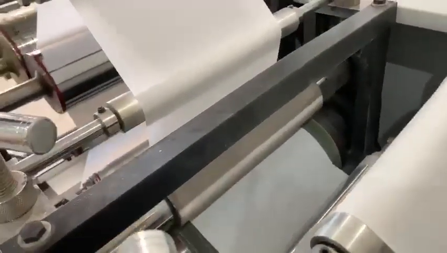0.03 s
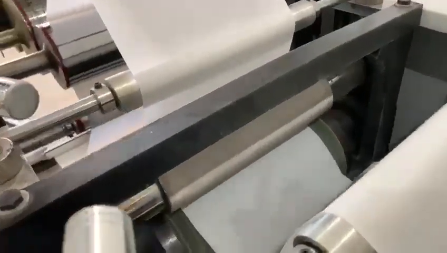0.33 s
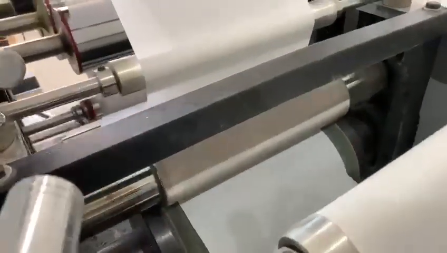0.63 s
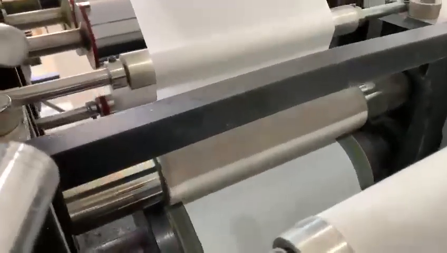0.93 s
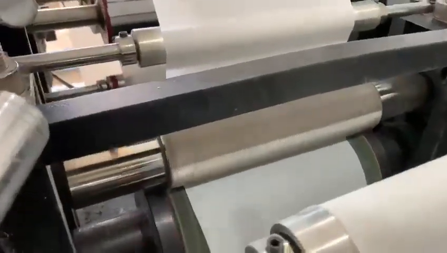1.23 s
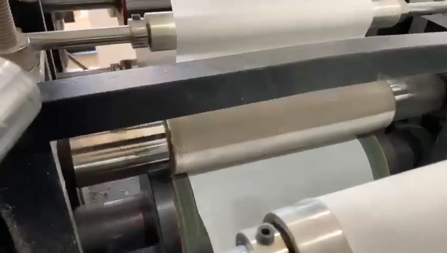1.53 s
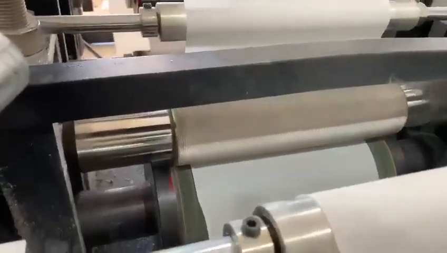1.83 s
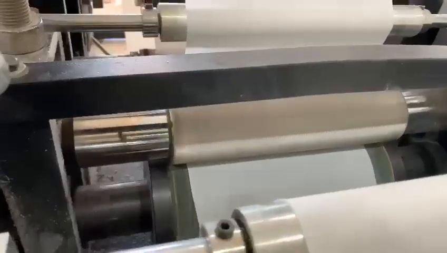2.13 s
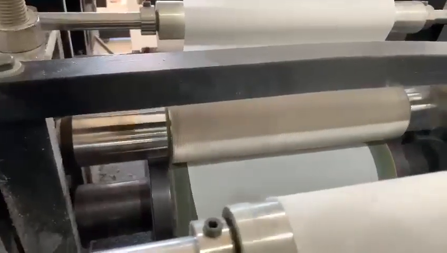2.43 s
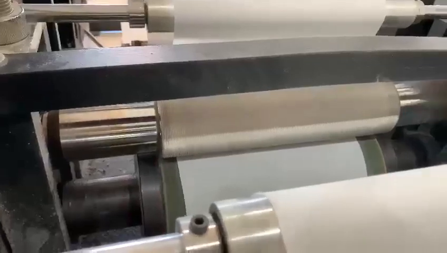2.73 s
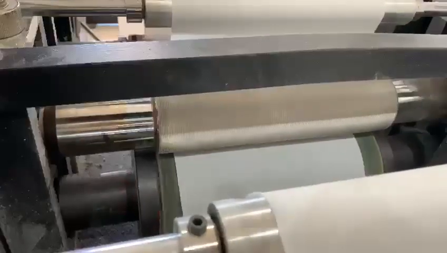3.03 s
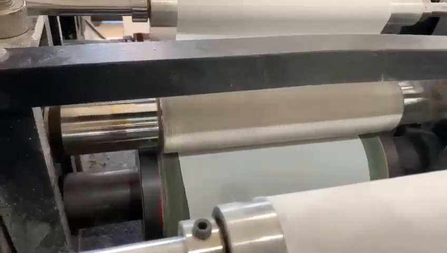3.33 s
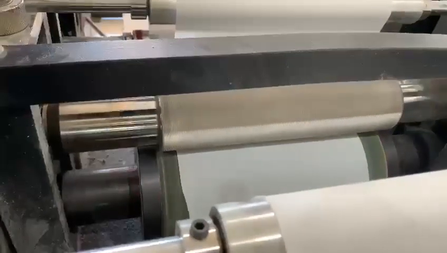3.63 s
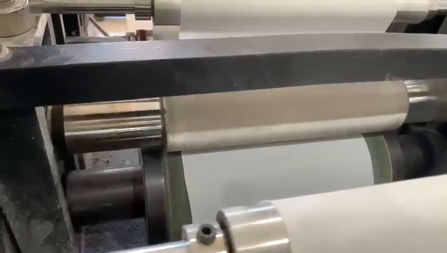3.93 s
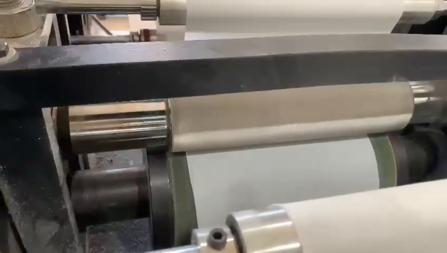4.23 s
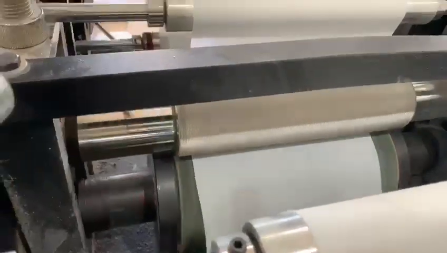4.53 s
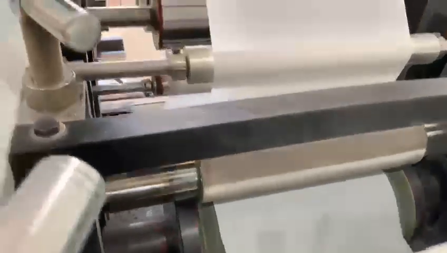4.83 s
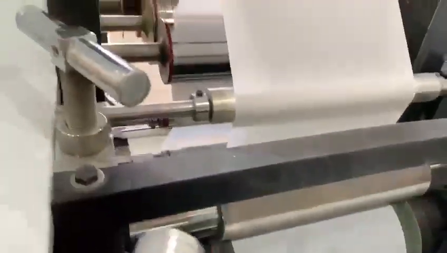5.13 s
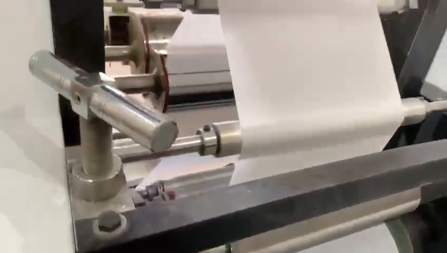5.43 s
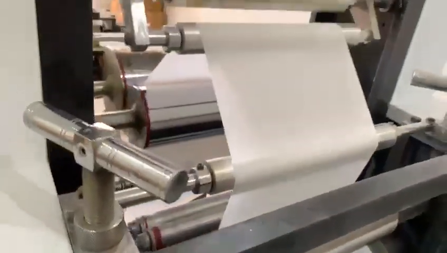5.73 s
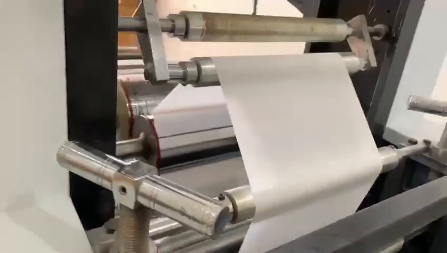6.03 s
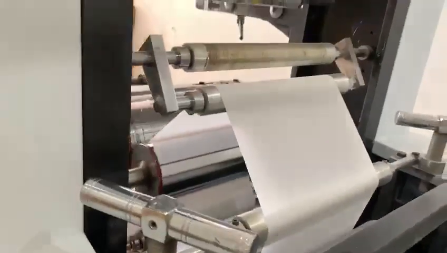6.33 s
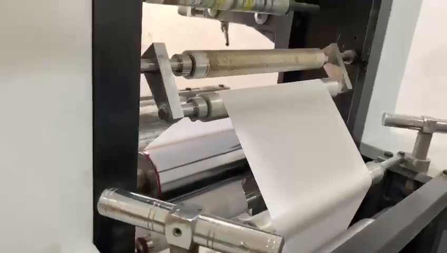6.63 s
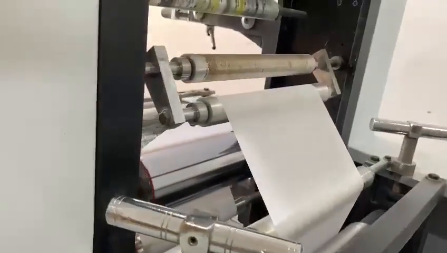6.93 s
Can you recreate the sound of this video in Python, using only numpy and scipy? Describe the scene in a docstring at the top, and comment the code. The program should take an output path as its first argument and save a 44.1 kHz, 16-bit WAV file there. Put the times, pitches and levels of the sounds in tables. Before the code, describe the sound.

A low machine rumble and motor hum carry on throughout as a close microphone moves along the rollers of a factory paper machine. A short droning note repeats about three times a second, mixed with bearing rattle, dull knocks and occasional light metal clinks. The moving paper adds a fine, ticking hiss, then a brief rustle toward the end as the drone drops away.

```python
"""Paper napkin machine in a factory hall

The machine runs steadily while the microphone moves along its rollers. The shaken steel frame rumbles,
with brief low swells, over a motor hum; a roller binds and drones once a turn, nearly three times a
second. The paper web hisses and ticks as it peels off the rollers, their bearings knock and chatter,
and loose steel parts clink lightly. Near the end an open span of paper rustles past."""
import sys
import numpy as np
from scipy import signal
from scipy.fft import rfft, irfft, next_fast_len
from scipy.io import wavfile
from scipy.ndimage import uniform_filter1d, map_coordinates

SR = 44100
rng = np.random.default_rng(int(sys.argv[2]) if len(sys.argv) > 2 else 0)


def digitize_waveform(pressure):
    """Quantize a signal to 16-bit integers and store it at the path in sys.argv[1].

    Rows of a 2-D input are taken as channels; values are limited to [-1, 1].
    """
    field = np.atleast_2d(pressure).T
    bounded = np.clip(field, -1, 1)
    quanta = np.round(bounded * 32767).astype(np.int16)
    wavfile.write(sys.argv[1], SR, quanta)


N = 316638
TURN_HZ = 2.865  # roller turns a second


def amp(db):
    """Decibels to gain."""
    return 10 ** (np.asarray(db) / 20)


def unit(x):
    """x scaled to rms 1."""
    return x / np.sqrt(np.mean(x ** 2) + 1e-20)


def along(points, hz):
    """A curve through (Hz, value) points, read on a log frequency axis."""
    point_hz, values = np.transpose(points)
    return np.interp(np.log(hz + 1), np.log(point_hz + 1), values)


def automation(points):
    """A fader move through (seconds, value) points, one value a sample."""
    return np.interp(np.arange(N) / SR, *np.transpose(points))


def wobble(rate):
    """A smooth random curve, rate knots a second."""
    knots = rng.standard_normal(int(N * rate / SR) + 4)
    return map_coordinates(knots, [np.arange(N) * rate / SR])


def cycle(per_turn, peak_s):
    """A swing between -1 and 1, locked to the roller's turn."""
    return np.cos(2 * np.pi * per_turn * TURN_HZ * (np.arange(N) / SR - peak_s))


def filtered(x, response):
    """x through an EQ given as gain against frequency."""
    size = next_fast_len(N + SR // 2)
    return irfft(rfft(x, size) * response(np.fft.rfftfreq(size, 1 / SR)), size)[..., :N]


def colour(points):
    """An EQ curve through (Hz, dB) points."""
    return lambda hz: amp(along(points, hz))


def resonances(modes):
    """The EQ curve of independently shaken modes: their powers add."""
    return lambda hz: np.sqrt(sum(
        (amp(db) * hz * width) ** 2 / ((centre ** 2 - hz ** 2) ** 2 + (hz * width) ** 2)
        for centre, width, db in modes))


def noise():
    """Two unrelated white noises."""
    return rng.standard_normal((2, N))


def patchy_noise(depth_db):
    """Two noises whose level drifts separately in every few hundred hertz."""
    spectrum = signal.stft(noise(), nperseg=512)[2]
    drift = uniform_filter1d(rng.standard_normal(spectrum.shape[1:]), size=4, axis=0)
    drift = uniform_filter1d(drift, size=9, axis=1)
    return signal.istft(spectrum * amp(depth_db * unit(drift)), nperseg=512)[1][:, :N]


def noise_burst(order, band_hz, length):
    """A short stereo burst of band-passed noise, rms 1."""
    band = signal.butter(order, band_hz, "bandpass", fs=SR, output="sos")
    return unit(signal.sosfilt(band, rng.standard_normal((2, length))))


def tone(hz):
    """A sine of rms 1 that follows a pitch curve."""
    return np.sqrt(2) * np.sin(2 * np.pi * (np.cumsum(hz) / SR + rng.random()))


def patter(per_s, level_db, scatter_db):
    """(seconds, dB) contacts at a steady mean rate, each at a chance moment within its slot."""
    count = int(per_s * N / SR)
    when, size = rng.random((count, 2)).T
    return zip((np.arange(count) + when) / per_s, level_db + scatter_db * (2 * size - 1))


def blows(contacts, t60_s, attack_s=.0008):
    """The envelope of (seconds, dB) contacts that hit at once and die away."""
    out, t = np.zeros(N + SR), np.arange(SR // 4) / SR
    for start, db in contacts:
        out[round(start * SR):][:len(t)] += amp(db - 60 * t / t60_s) * (1 - np.exp(-t / attack_s))
    return out[:N]


def panned(x, left_db):
    """x with the left side louder by left_db."""
    return x * amp(np.array([[left_db], [-left_db]]) / 2)


# Stereo image. Each row: frequency in Hz, left-right likeness (clipped to -1..1; 1 is mono).
LIKENESS = [(30, 0.83), (120, 0.95), (250, 0.87), (380, 0.74), (520, 0.28), (650, 0.3), (850, 0.16),
            (1400, -0.11), (1800, -0.33), (2400, 0.038), (4500, 0.11), (5500, 0.053), (6500, 0.77),
            (7600, -1.37)]


def spread(drive, response):
    """Two noises shaped into stereo of rms 1: narrow in the bass, mostly wide above."""
    def mid_side_eq(hz):
        angle = np.arccos(np.clip(along(LIKENESS, hz), -1, 1)) / 2
        return response(hz) * np.array([np.cos(angle), np.sin(angle)])
    mid, side = filtered(drive, mid_side_eq)
    return unit(np.array([mid + side, mid - side]))


# The microphone's closeness to the nip, where the big rollers meet. Each row: time in seconds, gain in dB.
NIP_CLOSENESS = [(0, -0.5), (1.1, 0), (2.6, 1), (3.6, -2), (4.4, -0.5), (5.4, -5), (5.9, -9.5), (6.4, -10),
                 (7.18, -9)]
# The ring of the frame, then of the nip. Each row: pitch in Hz, width in Hz, relative level in dB.
FRAME_MODES = [(53.7, 8, -16), (73.6, 16, -15), (107.5, 13, -8), (127, 12, -9), (143, 14, -9),
               (169, 2.5, -7.5), (176.3, 10.3, 0.5), (185.6, 26, -5.5), (206, 17, -12), (221, 12, -4),
               (250, 11.4, -7), (266, 14, -19), (305.6, 11.3, -2.5), (336, 29, -7.5)]
NIP_MODES = [(205.4, 9.7, -6.5), (361, 5, -6), (375.2, 6.9, 0.5), (397.5, 9.8, -5.5)]
# The dull bed of rumble. Each row: frequency in Hz, EQ gain in dB.
RUMBLE_EQ = [(20, -30), (45, -10.5), (85, -24), (102, -0.5), (200, 1), (320, 4), (400, -1), (560, -27),
             (1200, -108)]


def frame_rumble(cutoff_hz=470, follows_nip=.21):
    """The running gear shakes frame and nip, a little harder once a turn, over a broad rumble."""
    def shaken(modes):
        return spread(noise(), lambda hz: resonances(modes)(hz) / np.sqrt(1 + (hz / cutoff_hz) ** 8))
    close_db = automation(NIP_CLOSENESS)
    ring = amp(-19.5) * shaken(FRAME_MODES) + amp(-25.5 + close_db) * shaken(NIP_MODES)
    load_db = .5 * cycle(per_turn=1, peak_s=.22)
    shake_db = follows_nip * close_db + load_db + .5 * wobble(24)
    return amp(shake_db) * ring + amp(-25) * spread(noise(), colour(RUMBLE_EQ))


# Fader rides: the mains hum and the shaft's note slowly swell and dip.
# Each row: time in seconds, level in dB.
HUM_RIDE = [(0, -32), (0.8, -26.5), (1.8, -29), (2.7, -29), (3.6, -27), (4.0, -25), (4.6, -31),
            (5.6, -33.5), (6.1, -31), (7.18, -33.5)]
SHAFT_RIDE = [(0, -36), (1.8, -33), (3.6, -32), (4.1, -42), (4.8, -33), (5.5, -36), (5.85, -27), (6.2, -30),
              (6.6, -28), (7.18, -30)]
# Two close gear tones, then the drive's steady tones. Each row: pitch in Hz, relative level in dB.
GEAR_TONES = [(169, -28), (190.3, -28.5)]
DRIVE_TONES = [(52, -51), (674, -51), (2563, -53), (5970, -77)]


def motor(hum_hz=100, shaft_hz=257, waver_db=2.1):
    """Hum and shaft waver; the gears throb near the nip, and the drive's tones grow away from it."""
    close_db = automation(NIP_CLOSENESS)
    hum = amp(automation(HUM_RIDE) + waver_db * wobble(9)) * tone(hum_hz + .7 * wobble(9))
    shaft = amp(automation(SHAFT_RIDE) + waver_db * wobble(7.5)) * tone(shaft_hz + .87 * wobble(4.99))
    gears = sum(amp(db + 2 * wobble(17)) * tone(hz * (1 + .022 * wobble(14)))
                for hz, db in GEAR_TONES)
    drive = sum(amp(db + 1.7 * wobble(6.2)) * tone(hz * (1 + .00189 * wobble(16)))
                for hz, db in DRIVE_TONES)
    return hum + shaft + amp(.9 * close_db) * gears + amp(-.69 * close_db - 7) * drive


# The even rattle of the bearings. Each row: frequency in Hz, EQ gain in dB.
RATTLE_EQ = [(200, -31), (420, -4.5), (530, -0.5), (570, -3.5), (750, -3.5), (900, -7.5), (1300, -10),
             (1700, -11), (2400, -19), (5000, -99)]
# The ring of the hollow rollers. Each row: pitch in Hz, width in Hz, relative level in dB.
ROLLER_MODES = [(449, 19, -2.5), (476, 12, -2), (536.4, 14.4, -1), (601, 13, -4), (669, 16, -2),
                (670, 16, -10), (785, 22, -7), (1018, 13, -6.5), (1141, 11, -6), (1231, 10.4, -4.5),
                (1323, 20, -6)]


def rollers(follows_nip=.13):
    """The hollow rollers ring and rattle evenly on their bearings."""
    bearings = patchy_noise(depth_db=1.8) * amp(wobble(150))
    rattle = amp(-23) * spread(bearings, colour(RATTLE_EQ))
    ring = amp(-27) * spread(noise(), resonances(ROLLER_MODES))
    return (rattle + ring) * amp(follows_nip * automation(NIP_CLOSENESS))


# The bright hiss of the paper. Each row: frequency in Hz, EQ gain in dB.
HISS_EQ = [(700, -30), (1800, 0), (2600, 1.5), (3500, -0.5), (4400, -3.5), (5000, -7), (5800, -11),
           (6500, -9.5), (7400, -7), (8000, -14), (8600, -68)]


def paper_hiss(grain_db=1.0, flutter_db=.9):
    """The paper's fibres hiss in fine grains as the web peels off the rollers."""
    fibres = patchy_noise(depth_db=2.1) * amp(grain_db * wobble(900) + flutter_db * wobble(45))
    return amp(-32) * plate_reflections(spread(fibres, colour(HISS_EQ)))


def plate_reflections(x, count=4, gain=.28):
    """Near steel plates throw back weak early copies; their comb drifts as the microphone moves."""
    out, sway_s = x.copy(), .0005 * wobble(1)
    for _ in range(count):
        for side, delay_s in enumerate(rng.uniform(.002, .012, 2)):
            lag = ((delay_s + rng.normal() * sway_s) * SR).astype(int)
            out[side] += gain * x[side].take(np.arange(N) - lag, mode="wrap")
    return unit(out)


def paper_ticks(low_hz=2000, high_hz=6500, db_per_octave=-4, t60_s=.022, pan_db=5):
    """The web ticks finely as it leaves the rollers; each tick has its own pitch and place."""
    out, t = np.zeros((2, N + SR)), np.arange(SR // 25) / SR
    for start, db in patter(per_s=70, level_db=-32, scatter_db=4):
        pitch = np.exp(rng.uniform(np.log(low_hz), np.log(high_hz)))
        grain = noise_burst(2, [.85 * pitch, 1.15 * pitch], len(t))
        envelope = amp(db + db_per_octave * np.log2(pitch / low_hz) - 60 * t / t60_s)
        out[:, round(start * SR):][:, :len(t)] += panned(envelope * grain, rng.uniform(-pan_db, pan_db))
    return filtered(out[:, :N], lambda hz: hz < 8000)


# The faint airy top of the hiss. Each row: frequency in Hz, EQ gain in dB.
AIR_EQ = [(8800, -50), (9700, -2), (10600, 0), (11400, -3.5), (11800, -16)]


def paper_air(level_db=-53.5, flutter_db=1.4):
    """The finest hiss of the web, in mono, flutters a little."""
    envelope = amp(level_db + flutter_db * wobble(22))
    return envelope * unit(filtered(patchy_noise(depth_db=4)[0], colour(AIR_EQ)))


# Dull bearing knocks. Each row: start in seconds, level in dB.
KNOCK_HITS = [(.120, -27), (.595, -23), (.775, -24), (1.010, -27), (1.616, -27), (2.318, -22.5),
              (2.481, -23), (2.835, -24), (3.015, -27), (3.163, -24.5), (3.225, -25), (4.076, -25),
              (4.260, -26), (5.178, -26), (5.600, -26), (5.825, -24), (5.885, -24)]
# The ring of the bearing housings. Each row: pitch in Hz, width in Hz, relative level in dB.
HOUSING_MODES = [(1040, 140, -1), (1210, 110, 16), (1470, 180, -14), (1960, 400, -11)]
# The small chatter around the knocks. Each row: frequency in Hz, EQ gain in dB.
CHATTER_EQ = [(450, -40), (850, 0), (1500, 0), (2400, -5), (4300, -13), (5500, -26), (8000, -55)]


def bearing_play(top_hz=7500):
    """Play in the bearings lets the rollers knock in their housings and chatter unevenly."""
    def housing(hz):
        low_cut = np.clip(hz / HOUSING_MODES[0][0], 0, 1) ** 2
        return resonances(HOUSING_MODES)(hz) * low_cut * (hz < top_hz)
    knocks = blows(KNOCK_HITS, t60_s=.11) * spread(noise(), housing)
    contacts = patter(per_s=34, level_db=-29, scatter_db=3)
    chatter = blows(contacts, t60_s=.03) * spread(noise(), colour(CHATTER_EQ))
    return knocks + chatter


# One drone a turn. Each row: middle in seconds, level in dB, pitch in Hz, sag as a share of the pitch.
DRONE_NOTES = [(.255, -25, 336, -.005), (.590, -22, 339, 0), (.934, -21.5, 334, 0), (1.316, -22, 341, -.03),
               (1.622, -19.5, 337, .035), (1.964, -18.7, 335, 0), (2.349, -20.7, 340, .055),
               (2.682, -19.7, 334, .05), (3.041, -19.5, 333.5, .025), (3.354, -18.3, 335, -.01),
               (3.712, -17.5, 336, -.01), (4.067, -22, 341, .01), (4.433, -18, 336.5, .02),
               (4.776, -18.2, 336, .05), (5.131, -21, 333.5, .03), (5.464, -26, 334, .02),
               (5.809, -24, 330, -.03), (6.157, -28, 335, -.03)]


def roller_drone(length_s=.265, fade_s=.092, waver=.008, rough_db=1.6, octave_db=-25):
    """Once a turn the roller binds and hums a clear note, which bends as the load passes."""
    t = np.arange(N) / SR
    gain, pitch = np.zeros(N), np.full(N, float(DRONE_NOTES[0][2]))
    for middle, db, hz, sag in DRONE_NOTES:
        since = t - middle
        gate = np.clip((length_s / 2 - np.abs(since)) / fade_s, 0, 1)
        gain += amp(db) * gate
        pitch = np.where(gate > 0, hz * (1 - sag * since / length_s), pitch)
    pitch *= 1 + waver * wobble(40)
    return gain * amp(rough_db * wobble(45)) * (tone(pitch) + amp(octave_db) * tone(2 * pitch))


# Light steel contacts. Each row: start in seconds, relative level in dB, trim in dB for the low ring
# and low scrape, trim in dB for the whole scrape.
CLINK_HITS = [(.130, -25, -1, -9), (.492, -16.5, 7, -16), (1.507, -19, -1.5, 3), (1.524, -25, 1, 4),
              (1.819, -29, -4, -6), (2.245, -27, -6, -8), (2.612, -25, -4, -7), (2.973, -30, -5, -8),
              (3.338, -24.5, -12, -9), (3.709, -22, -8, -7), (4.519, -23, -7, -7), (4.809, -25, -8, -8),
              (5.175, -19, -10, -9), (5.386, -30, -6, -8), (6.269, -28.5, -6, -8), (6.349, -30, -5, -8)]
# The ring of the loose steel. Each row: pitch in Hz, relative level in dB, seconds to fall by 60 dB.
STEEL_MODES = [(2560, -1, .17), (5970, -3, .1), (6190, -10, .06), (6425, 0, .07), (6540, -7, .06),
               (6720, -10, .07)]


def clinks(attack_s=.0015, bounce_db=-9):
    """A loose steel part scrapes, rings and bounces once."""
    out, t = np.zeros((2, N + SR)), np.arange(SR // 5) / SR
    hz, mode_db, t60 = np.transpose(STEEL_MODES)[:, :, None]
    rise = 1 - np.exp(-t / attack_s)
    for start, db, low_db, scrape_db in CLINK_HITS:
        for delay, blow_db in [(0, 0), (rng.uniform(.008, .016), bounce_db)]:
            strength_db = mode_db + (hz < 4000) * low_db + rng.standard_normal(hz.shape)
            # A wandering phase blurs each partial; an offset on each side widens it.
            blur = .035 * np.cumsum(rng.standard_normal((len(hz), len(t))), axis=1)
            phase = blur + rng.uniform(0, 2 * np.pi, hz.shape) + .5 * rng.standard_normal((2, *hz.shape))
            ring = (amp(strength_db - 60 * t / t60) * np.sin(2 * np.pi * hz * t + phase)).sum(axis=1)
            scrape = amp(scrape_db + low_db - 60 * t / .12) * noise_burst(3, [1700, 3300], len(t))
            edge = amp(scrape_db - 4 - 60 * t / .06) * noise_burst(5, [3500, 7200], len(t))
            clink = amp(db + blow_db - 9) * (ring + scrape + edge) * rise
            out[:, round((start + delay) * SR):][:, :len(t)] += clink
    return out[:, :N]


# Brief swells of the low rumble. Each row: middle in seconds, level in dB.
RUMBLE_SWELLS = [(.47, -22), (1.17, -18.5), (1.85, -22), (2.32, -18), (2.69, -19.5), (2.95, -22),
                 (3.19, -20), (3.52, -20.5), (4.30, -18.5), (4.81, -20), (5.32, -22), (5.86, -17.5),
                 (6.18, -22)]
# Their narrow band of noise. Each row: frequency in Hz, EQ gain in dB.
SWELL_EQ = [(40, -70), (90, -38), (135, -7), (170, 0), (200, 0), (235, -5), (300, -10), (420, -40),
            (900, -110)]


def rumble_swells(length_s=.25, note_hz=172):
    """The low rumble swells briefly around a wavering note."""
    t = np.arange(N) / SR
    swell = sum(amp(db) * np.cos(np.pi * np.clip((t - middle) / length_s, -.5, .5))
                for middle, db in RUMBLE_SWELLS)
    note = amp(-4 + 1.5 * wobble(20)) * tone(note_hz * (1 + .02 * wobble(16)))
    rumble = spread(noise(), colour(SWELL_EQ))
    return swell * unit(rumble + note)


# Fader ride for the open span of paper. Each row: time in seconds, level in dB.
SPAN_RIDE = [(0, -50), (4.8, -53), (5.5, -34), (6.1, -32), (6.6, -47), (7.18, -37)]
# The sheet's ring, applied twice to sharpen it. Each row: pitch in Hz, width in Hz, gain in dB per pass.
SHEET_MODES = [(1300, 200, -3), (1650, 360, 11), (1910, 180, -2)]


def span_rustle(grain_db=2.5):
    """The taut sheet flutters in short grains, swelling as the microphone passes it."""
    grains = noise() * amp(grain_db * wobble(200))
    ring = resonances(SHEET_MODES)
    return amp(automation(SPAN_RIDE)) * spread(grains, lambda hz: ring(hz) ** 2)


# The hall's reverb. Each row: frequency in Hz, seconds to fall by 60 dB.
HALL_DECAY = [(200, 0.64), (2000, 0.23), (10000, 0.13)]


def hall(x):
    """The hall's diffuse answer; the treble dies first."""
    hz, t, spectrum = signal.stft(rng.standard_normal((2, SR // 2)), SR, nperseg=256)
    decay = amp(-60 * t / along(HALL_DECAY, hz)[:, None])
    tail = signal.istft(spectrum * decay, SR, nperseg=256)[1]
    return signal.fftconvolve(x, tail / np.linalg.norm(tail[0]), axes=1)[:, :N]


def scene():
    """The low machine sounds sit a little to the right; the paper is all around."""
    near = panned(roller_drone(), left_db=-3.5) + clinks() + bearing_play()
    reverb = amp(-22.5) * hall(near)
    low_end = frame_rumble() + rumble_swells() + motor()
    tug = amp(.45 * cycle(per_turn=2, peak_s=.093))  # the web is tugged twice a turn
    web = tug * (rollers() + paper_hiss()) + paper_ticks() + span_rustle() + paper_air()
    return near + reverb + panned(low_end, left_db=-1) + panned(web, left_db=-.33)


def record(dry, top_hz=11750):
    """A brick-wall high cut on the whole mix."""
    return filtered(dry, lambda hz: hz < top_hz)


dry = scene()
out = record(dry)
digitize_waveform(out)
```